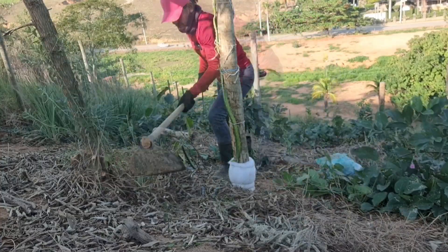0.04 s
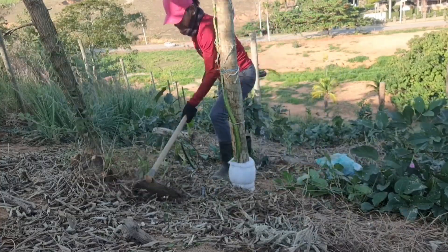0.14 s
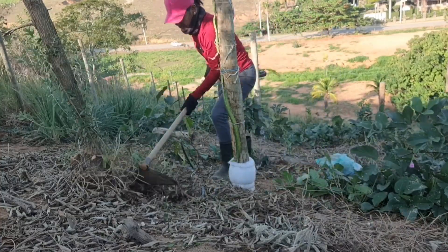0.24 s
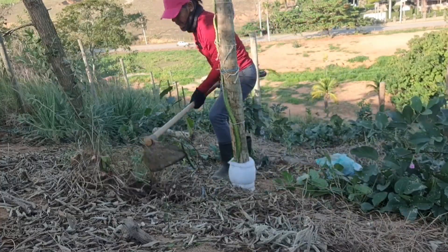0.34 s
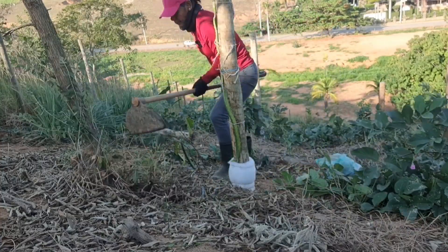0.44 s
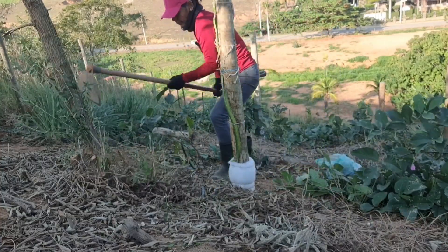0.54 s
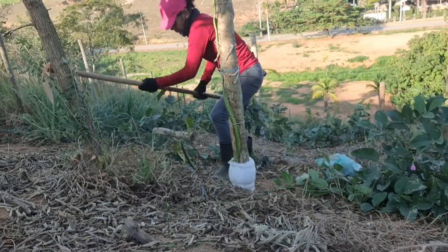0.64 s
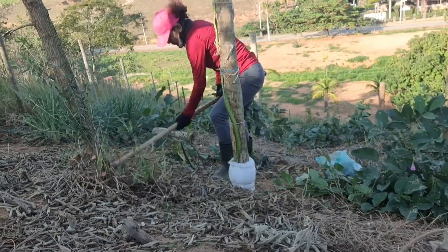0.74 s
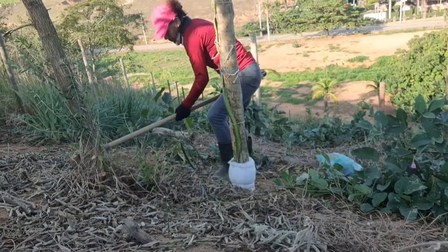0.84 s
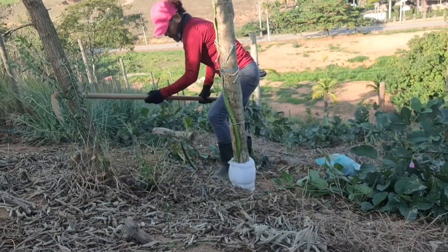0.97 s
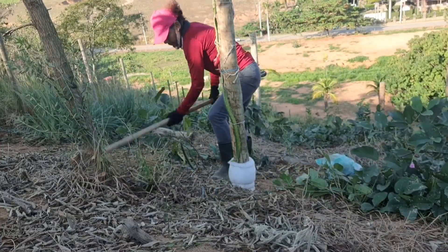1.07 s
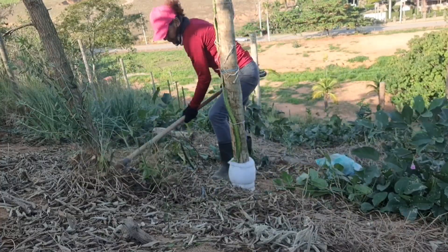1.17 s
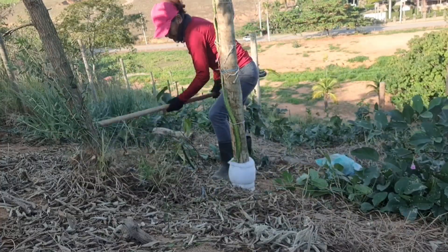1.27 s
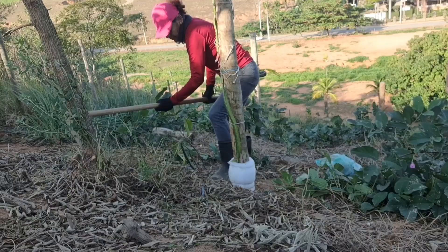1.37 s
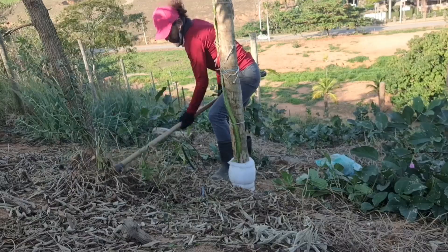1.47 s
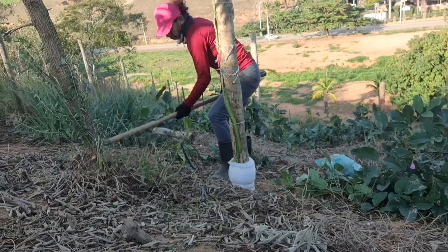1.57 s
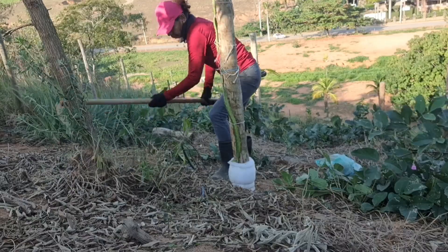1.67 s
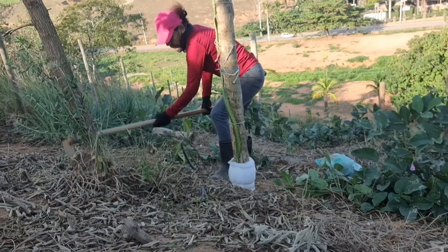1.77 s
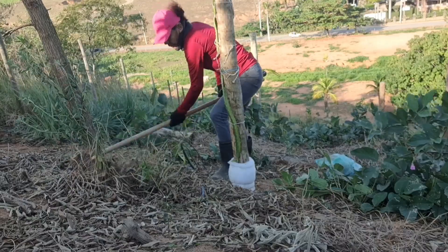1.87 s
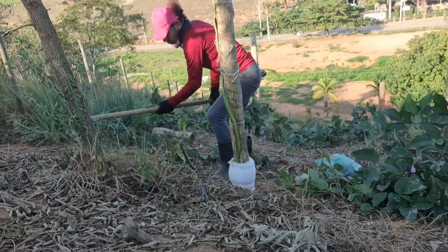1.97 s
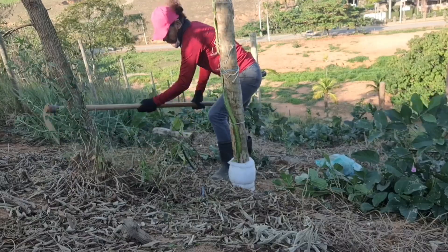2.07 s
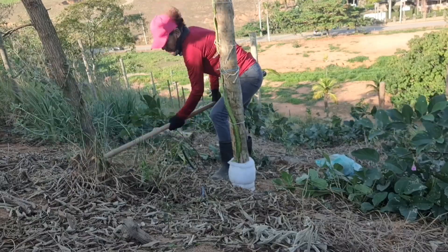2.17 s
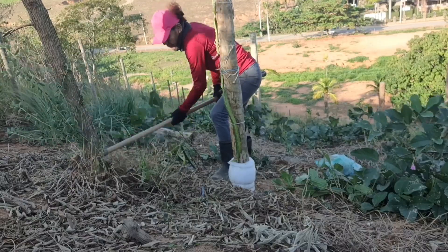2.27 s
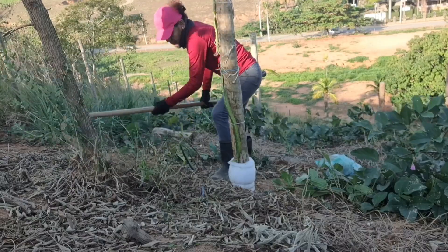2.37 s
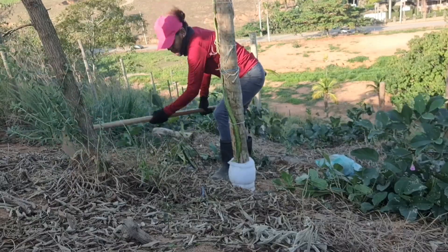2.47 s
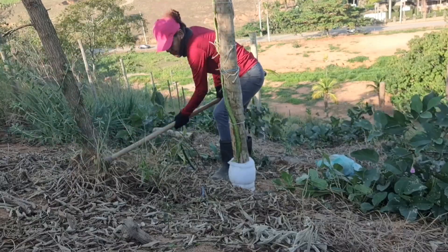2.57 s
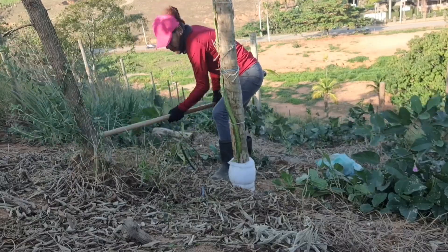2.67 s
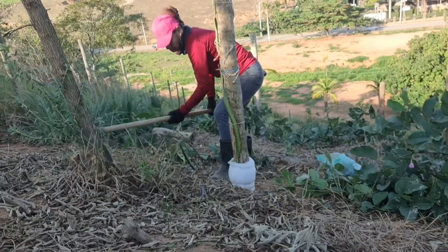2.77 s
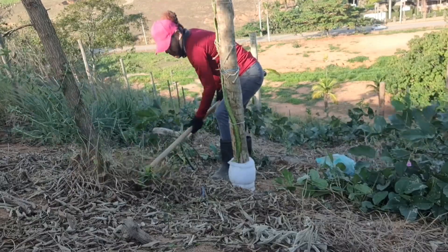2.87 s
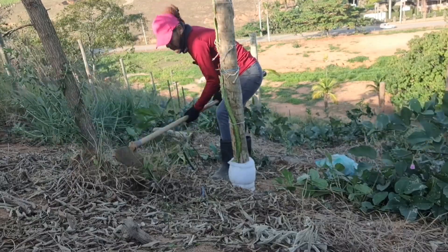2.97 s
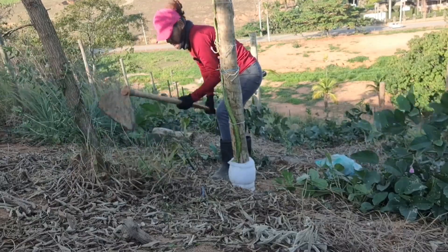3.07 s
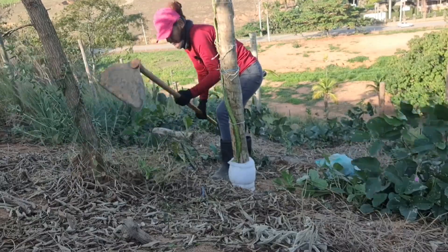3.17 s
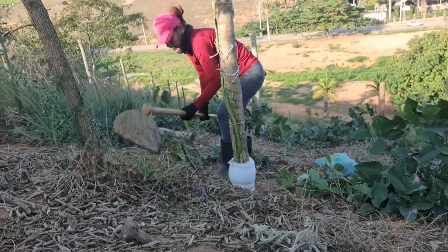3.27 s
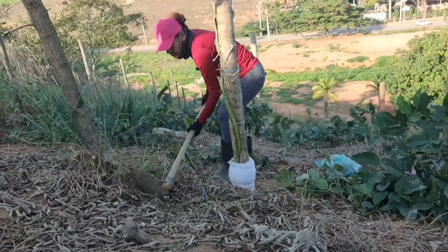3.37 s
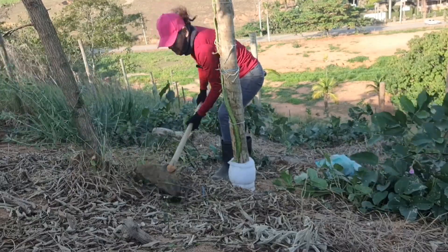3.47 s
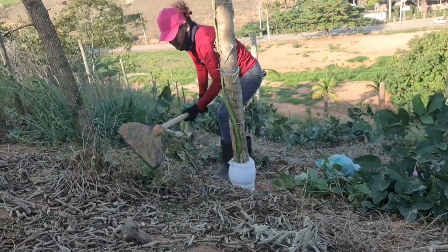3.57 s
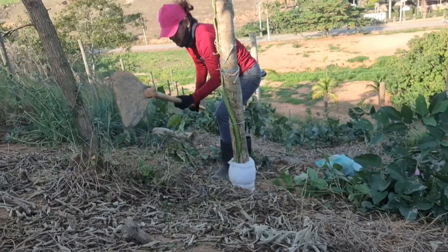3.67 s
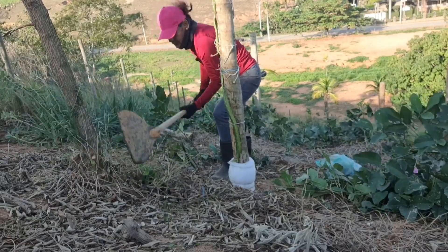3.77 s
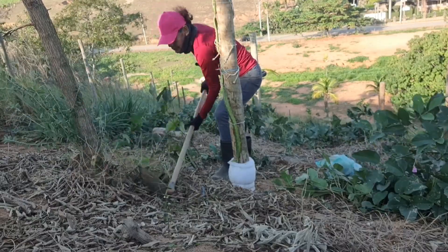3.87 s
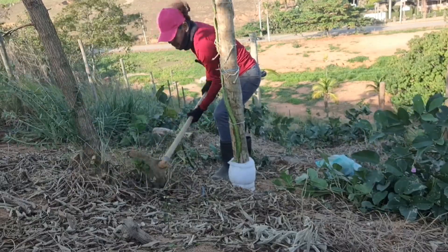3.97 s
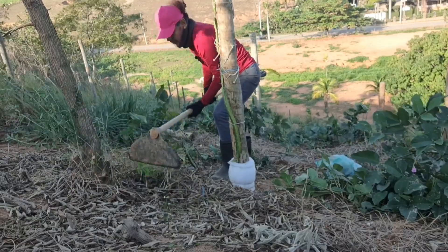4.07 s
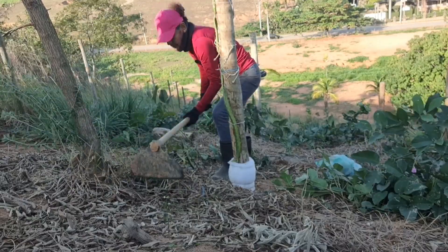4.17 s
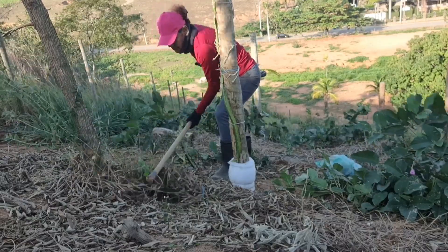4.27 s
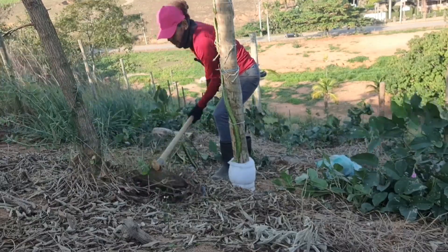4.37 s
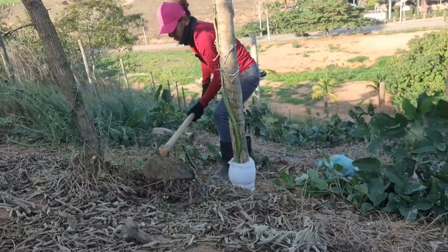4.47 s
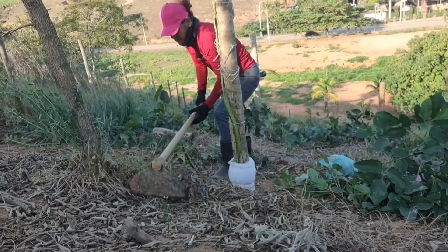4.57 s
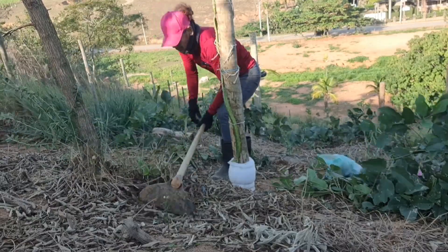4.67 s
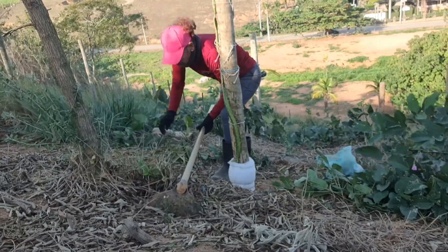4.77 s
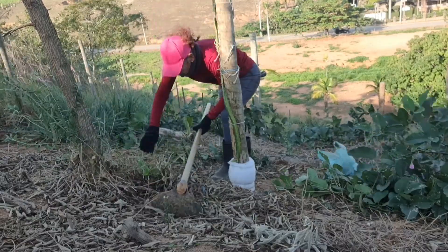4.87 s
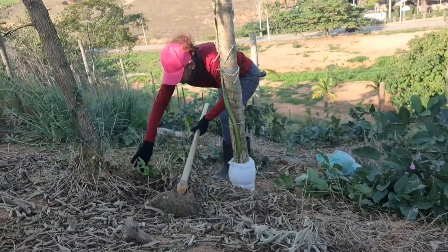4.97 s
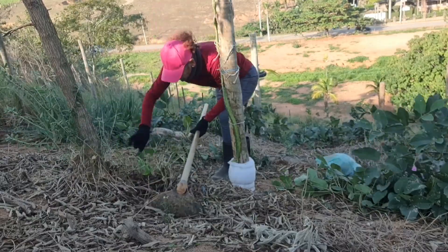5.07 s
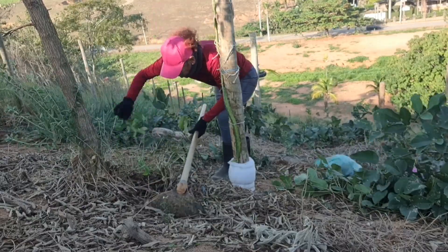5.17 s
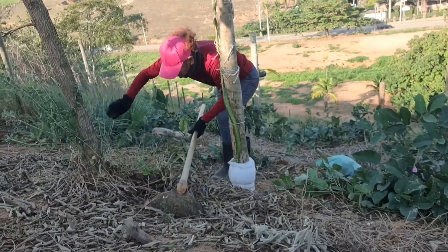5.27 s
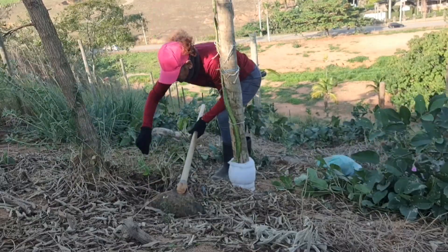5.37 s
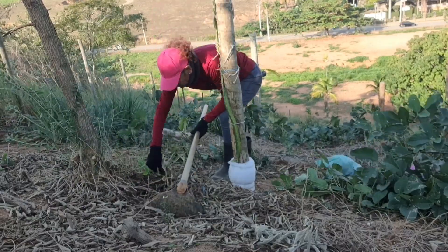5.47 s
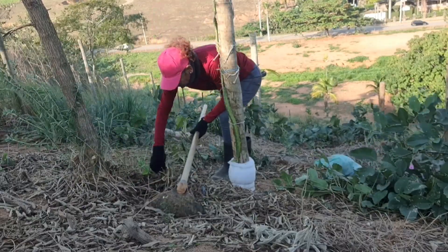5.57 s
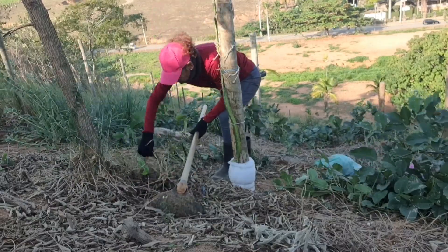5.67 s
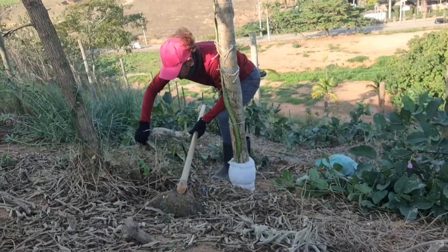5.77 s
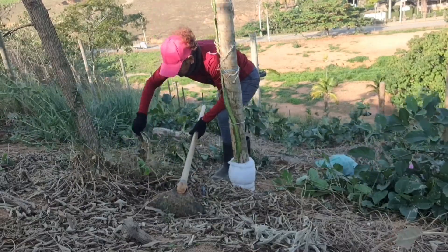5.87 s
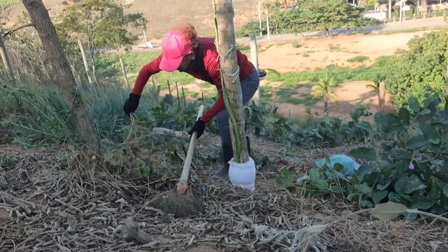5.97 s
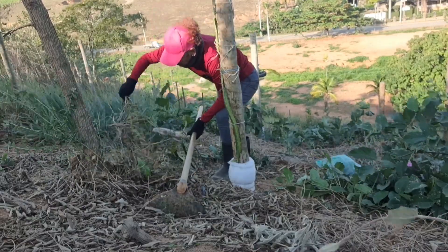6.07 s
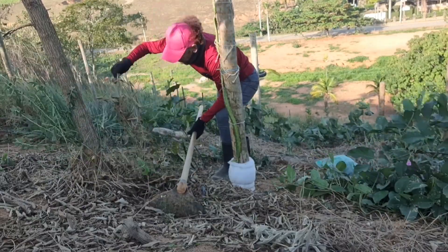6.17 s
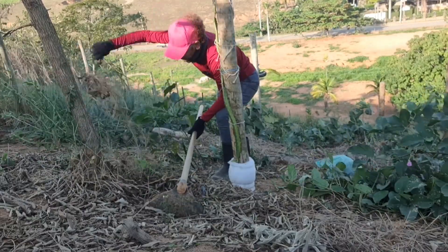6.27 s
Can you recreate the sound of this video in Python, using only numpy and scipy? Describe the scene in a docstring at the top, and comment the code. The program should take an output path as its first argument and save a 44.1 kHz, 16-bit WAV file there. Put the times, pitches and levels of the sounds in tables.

```python
"""A hand hoe chops weeds out of dry garden soil under straw mulch; then a hand tears out and shakes weeds.
Each chop is filtered grains: crumbs and stalks fracture and tap a modal blade, which then drags straw back.
The blade also knocks on packed earth and clinks on stones, as decaying sine modes with a thud or some grit.
Behind it, filtered noise makes open air, insects, road hiss and wind bumps; a wavering sine is a far engine.
All of it reaches one microphone, the same in both channels."""
import sys
import numpy as np
from scipy import signal
from scipy.fft import rfft, irfft
from scipy.io import wavfile
from scipy.ndimage import uniform_filter1d

SR = 44100
rng = np.random.default_rng(int(sys.argv[2]) if len(sys.argv) > 2 else 0)


def master_out(mix):
    """Clip the mix to full scale and print it as 16-bit PCM to the path in sys.argv[1]."""
    frames = np.transpose(np.atleast_2d(mix))
    ceiling = np.clip(frames, -1, 1)
    pcm = np.round(ceiling * 32767).astype(np.int16)
    wavfile.write(sys.argv[1], SR, pcm)


N = 279241
TIME = np.arange(N) / SR
TOP_HZ = 15850  # upper edge of the sound

# spectrum of breaking soil: hz, relative level_db per Hz
SOIL_SPECTRUM = [(100, -25.5), (220, -8.5), (340, -0.5), (490, -11), (690, 2), (880, 0.5), (1080, -5),
                 (1350, -6.5), (1900, -3.5), (2650, -4.5), (3300, -15.5), (6000, -13), (15000, -25)]
# hoe strokes, each a bite and then a pull through the mulch: start_s, soil_db, stalk_crunch_db, bite_s,
# focus_hz (what the contact excites most), pull_db, pull_s, slowing_db_per_s; levels are relative
HOE_STROKES = [(0.158, -39, -20.5, 0.037, 1950, -18, 0.31, 58.5),
               (0.785, -16.5, -9, 0.011, 2230, -29, 0.12, 34),
               (1.133, -17, -14, 0.014, 1760, -22.5, 0.17, 63),
               (1.486, -13, -14, 0.0036, 2150, -28.5, .12, 9),
               (1.841, -12.5, -17, 0.0033, 576, -21.5, 0.22, 34),
               (2.2, -13.5, -12, 0.0031, 1370, -27.5, .2, 13.5),
               (2.569, -15, -22.5, 0.0034, 1070, -28, 0.24, 32),
               (2.856, -19, -18, 0.031, 670, -26.5, 0.19, 42),
               (3.386, -12.5, -31, 0.008, 1750, -20.5, 0.074, 131),
               (3.879, -16, -13.5, 0.021, 1500, -26, 0.13, 86),
               (4.048, -23.5, -47, 0.0077, 1060, -61, .03, 50),
               (4.272, -18, -17.5, 0.023, 1700, -22.5, 0.2, 59),
               (4.667, -26, -16.5, 0.0046, 800, -43.5, 0.14, 20)]


def undb(db):
    """Decibels to gain."""
    return 10 ** (np.asarray(db) / 20)


def unit(x):
    """Scale to rms 1."""
    return x / np.sqrt(np.mean(x ** 2))


def curve(rows, axis=1):
    """One column of a table, joined by straight lines in time."""
    rows = np.array(rows)
    return np.interp(TIME, rows[:, 0], rows[:, axis])


def noise():
    """White noise over the whole scene."""
    return rng.standard_normal(N)


def colour(x, points, size=4096):
    """Minimum-phase filter through (Hz, dB) points; the result has rms 1."""
    hz, db = np.transpose(points)
    bins = np.maximum(np.arange(size // 2 + 1) * SR / size, 1)
    gain = undb(np.interp(np.log(bins), np.log(hz), db))
    # folding the cepstrum makes the filter causal
    cepstrum = irfft(np.log(gain))
    cepstrum[1:size // 2] *= 2
    cepstrum[size // 2 + 1:] = 0
    response = irfft(np.exp(rfft(cepstrum)))
    return unit(signal.oaconvolve(x, response)[:N])


def walk(rate):
    """Smooth random drift with rms 1, taking a new direction `rate` times a second."""
    step = int(SR / rate)
    held = np.repeat(rng.standard_normal(N // step + 1), step)
    return unit(uniform_filter1d(held, step)[:N])


def grains(rate, spread_db, cap_db):
    """Tiny fractures at random moments, `rate` a second: many weak, a few strong."""
    size_db = np.minimum(spread_db * rng.exponential(size=N), cap_db)
    happens = rng.random(N) < rate / SR
    return unit(happens * rng.choice([-1, 1], N) * undb(size_db))


def burst(s, swell, fade, hold=0, db_per_s=0):
    """A force that grows up to its moment, holds while the effort rises or sags, and then dies away."""
    away = np.maximum((s - TIME) / swell, (TIME - s - hold) / fade)
    edges = np.exp(-np.clip(away, 0, 20))
    if not db_per_s:
        return edges
    return edges * undb(db_per_s * np.clip(TIME - s, 0, hold))


def open_air():
    """Steady noise of the open air, heaviest in the bass."""
    # air spectrum: hz, relative level_db per Hz
    air_spectrum = [(20, -9.5), (45, -6.5), (75, -0.5), (110, 4), (165, -10), (260, -12.5), (420, -17.5),
                    (800, -18), (1500, -24.5), (3500, -30), (6000, -35), (8000, -34), (15000, -27)]
    return undb(-40) * colour(noise(), air_spectrum)


def insects():
    """Faint insects in the grass: a narrow band of noise whose level flutters."""
    # insect spectrum: hz, relative level_db per Hz
    insect_spectrum = [(4600, -47), (5900, -8), (7400, -56)]
    chirping = undb(4.5 * walk(rate=16))
    return undb(-64.5) * chirping * colour(noise(), insect_spectrum)


def road():
    """Tyre noise from the far road, rising and falling with the traffic."""
    # traffic: time_s, level_db
    traffic = [(.9, -61), (2, -43.5), (3.65, -42), (4.2, -41.5), (4.9, -47), (5.4, -38), (6.33, -43.5)]
    # tyre spectrum: hz, relative level_db per Hz
    tyre_spectrum = [(50, 1.5), (160, 9), (230, 6), (450, -4.5), (1100, -3), (1900, -16.5), (12000, -27.5)]
    return undb(curve(traffic)) * colour(noise(), tyre_spectrum)


def far_engine():
    """An unevenly firing engine whose treble is lost on the way, so only a loping sine is left."""
    # engine: time_s, mean firing_rate_hz, level_db
    engine = [(0.0, 108.9, -43), (2.89, 93.84, -38), (6.06, 97.3, -41.5), (6.33, 118, -38)]
    rate_hz = curve(engine) * (1 + 0.0233 * walk(rate=35))
    turn = 2 * np.pi * np.cumsum(rate_hz) / SR
    lope = 1 + 0.91 * np.sin(turn / 4)  # four unequal cylinders
    drone = unit(np.sin(turn) * lope * undb(2.4 * walk(rate=47)))
    return drone * undb(curve(engine, axis=2))


def wind():
    """Short eddies push on the microphone as bumps of bass noise."""
    # gusts: peak_s, level_db, swell_and_fade_s
    gusts = [(2.067, -16, 0.0079), (2.44, -18, 0.032), (2.7, -26, 0.097), (3.332, -25.5, 0.032),
             (5.833, -25, 0.036), (5.895, -24.5, 0.079), (6.019, -15.5, 0.016)]
    # wind spectrum: hz, relative level_db per Hz
    wind_spectrum = [(15, 1), (40, 5), (110, 7), (200, -10.5), (400, -17.5), (4000, -54.5)]
    push = sum(undb(db) * burst(s, half, half) for s, db, half in gusts)
    return push * colour(noise(), wind_spectrum)


def garden(x, wet_db=-17, t60=0.45, order=14):
    """Trunks and bushes scatter a short, weak tail back: decaying noise, t60 in seconds."""
    t = TIME[:2 ** order]
    tail = rng.standard_normal(len(t)) * np.exp(-np.log(1000) * t / t60)
    tail = tail / np.sqrt(np.sum(tail ** 2))
    return x + undb(wet_db) * signal.oaconvolve(x, tail)[:N]


def ground_echo(x):
    """The sound arrives a second time off the ground, which carves moving notches into it."""
    # echo behind the direct rustle, later when the stalks are higher up: time_s, lag_ms
    echo_lag = [(.16, 0.098), (.27, 0.115), (.62, 0.05), (.8, 0.14), (5.55, 0.15), (5.95, 0.21), (6.33, .2)]
    late = np.interp(TIME - curve(echo_lag) / 1000, TIME, x)
    return 0.89 * x + 0.28 * late


def crackle(rate, spread_db, patchy_db, count=18):
    """Stalks click at many pitches for a few cycles in a changing mix; a few twigs tick sharply."""
    edges = np.linspace(0, SR / 2, count + 1)
    bins = np.arange(N // 2 + 1) * SR / N
    spectrum = 0
    # overlapping bands, each with its own clicks and its own drifting level
    for hz in edges[edges < TOP_HZ + edges[1]]:
        band = np.cos(np.pi / 2 * np.minimum(abs(bins - hz) / edges[1], 1))
        clicks = grains(rate, spread_db, cap_db=13)
        spectrum = spectrum + band * rfft(clicks * undb(patchy_db * walk(rate=25)))
    twigs = undb(-12.5) * grains(rate=55, spread_db=3, cap_db=7)
    return unit(irfft(spectrum, N)) + twigs


def weeds():
    """Leaves and roots rustle with each tug of the hand; short bright snaps come here and in the hoeing."""
    # the hand gripping, tearing and shaking: start_s, level_db, length_s, effort_growth_db_per_s
    tugs = [(5.023, -44, 0.057, 74), (5.511, -32, 0.28, 21), (5.775, -18.5, 0.039, -40),
            (5.886, -20.5, 0.27, -11), (6.132, -19, 0.056, 0), (6.256, -27, .1, 18)]
    # short bright snaps and rustles of stalks and roots, during hoeing and pulling: peak_s, level_db, fade_s
    snaps = [(0.904, -25.5, 0.0054), (1.448, -32.5, 0.021), (2.515, -30.5, 0.027), (2.82, -19.5, 0.0061),
             (3.067, -28, 0.0045), (3.213, -32.5, 0.0047), (4.76, -30, 0.016), (5.1, -30, 0.0073),
             (5.431, -36, 0.0047), (5.774, -9.5, 0.0088), (5.891, -8, 0.0092), (5.927, -19, 0.007),
             (6.188, -21, 0.0018), (6.212, -14.5, 0.0018)]
    # leaf spectrum: hz, relative level_db per Hz
    leaf_spectrum = [(300, -15.5), (1200, -15), (3000, -10), (6200, -4), (9400, -6.5), (14200, 3.5),
                     (15800, -3)]
    fractures = crackle(rate=2200, spread_db=6.0, patchy_db=2.0)
    rustle = colour(fractures, leaf_spectrum) * undb(1.46 * walk(rate=95))
    pulls = [undb(db) * burst(s, swell=0.008, fade=0.056, hold=length, db_per_s=growth)
             for s, db, length, growth in tugs]
    effort = np.max(pulls, axis=0)  # the strongest tug wins
    snap_force = sum(undb(db) * burst(s, swell=0.0014, fade=fade) for s, db, fade in snaps)
    return ground_echo(rustle * effort + snap_force * colour(noise(), leaf_spectrum))


def blade_ring(focus_hz, bedded=0, order=13):
    """The blade's answer to one tap, energy 1; contact picks its modes, soil shifts and damps them."""
    # free modes of the blade on its handle: mode_hz, relative level_db, t60_s
    blade_modes = [(370, -10, 0.082), (686, 0, 0.082), (842.4, 4, 0.097), (1054, -20, 0.36),
                   (1362, -1.5, 0.041), (1712, -1, 0.046), (1886, -1.5, 0.047), (2375, 4.5, 0.015),
                   (3030, -17, 0.055)]
    t = TIME[:2 ** order]
    hz, db, t60 = np.transpose(blade_modes)
    level_chance, pitch_chance = rng.standard_normal((2, len(blade_modes)))
    octaves = abs(np.log2(hz / focus_hz))
    focus_db = 8.3 * np.exp(-(octaves / 0.16) ** 2) - 9.1 * octaves
    size = undb(db + focus_db + 2 * bedded * level_chance)
    hz = hz * (1 + 0.018 * bedded * pitch_chance)
    t60 = t60 / (1 + 1.13 * bedded)
    decay = np.exp(-np.log(1000) * np.outer(1 / t60, t))
    ring = size @ (np.sin(2 * np.pi * np.outer(hz, t)) * decay)
    return ring / np.sqrt(np.sum(ring ** 2))


def clinks():
    """A hard point of stone sets the free blade ringing, with a short gritty crack."""
    # steel meeting a stone: start_s, relative level_db, focus_hz (what the contact excites most)
    stone_hits = [(.263, -16, 1870), (.266, -22, 790), (1.213, -24, 1880), (1.23, -29, 1690),
                  (1.271, -27.5, 1750), (2.517, -21.5, 960), (2.579, -21, 850), (2.662, -21.5, 985),
                  (2.823, -13.5, 930), (4.769, -25.5, 745)]
    out = np.zeros(N)
    grit = colour(noise(), SOIL_SPECTRUM)
    for s, db, focus_hz in stone_hits:
        ring = blade_ring(focus_hz)
        start = int(s * SR)
        # the bending takes a moment to fill the plate
        ring = ring * (1 - np.exp(-TIME[:len(ring)] / 0.00081))
        out[start:start + len(ring)] += undb(db + 1.0) * ring / np.abs(ring).max()
        out += undb(db - 11) * grit * burst(s, swell=0.0013, fade=0.0057)
    return out


def knocks(order=8):
    """The edge stops dead on packed earth: one push thuds in the ground and rings the buried blade."""
    # edge meeting packed earth: start_s, level_db, focus_hz (what the contact excites most)
    earth_hits = [(.794, -18.5, 666), (1.141, -23, 1700), (1.488, -21.5, 1340), (1.84, -19.5, 694),
                  (2.2, -13.5, 710), (2.57, -24, 1290), (2.876, -23, 830), (3.402, -12.5, 770),
                  (4.278, -19, 855)]
    out = np.zeros(N)
    thud = colour(signal.unit_impulse(N), SOIL_SPECTRUM)
    thud = thud / np.abs(thud).max()
    for s, db, focus_hz in earth_hits:
        ring = blade_ring(focus_hz, bedded=1.1)
        start = int(s * SR)
        knock = ring / np.abs(ring).max() + undb(1.5) * thud[:len(ring)]
        # earth cushions the contact
        knock = knock * (1 - np.exp(-TIME[:len(ring)] / 0.00073))
        # the level is that of the first few milliseconds
        out[start:start + len(ring)] += undb(db) * knock / np.std(knock[:2 ** order])
    return out


def pulling():
    """Each pull starts with the bite, slows steadily and stops as the blade lifts; the straw settles."""
    swell_s, fade_s = 0.0065, 0.046
    settle_db, settle_fade_s = -23, 0.16  # loose straw slides on after the pull; level relative to it
    power = 0
    for s, *_, db, length, slowing in HOE_STROKES:
        pull = burst(s, swell_s, fade_s, length, -slowing)
        settling = undb(settle_db) * burst(s, swell_s, settle_fade_s, length)
        power = power + undb(db) ** 2 * (pull ** 2 + settling ** 2)
    return np.sqrt(power)


def straw():
    """Mulch crackles as the blade pulls it back; crumbs roll along and tick on the steel."""
    # spectrum of dragged mulch: hz, relative level_db per Hz
    mulch_spectrum = [(300, -27), (1900, -11.5), (5300, -4), (10000, -5), (14300, 2.5), (15800, -3.5)]
    fractures = crackle(rate=2500, spread_db=2.5, patchy_db=0.2)
    stalks = colour(fractures, mulch_spectrum) * undb(1.47 * walk(rate=130))
    crumbs = colour(grains(rate=160, spread_db=4, cap_db=10), SOIL_SPECTRUM)
    taps = grains(rate=70, spread_db=3, cap_db=6)
    ticks = signal.oaconvolve(taps, blade_ring(focus_hz=1800, bedded=.5))[:N]
    return (ground_echo(stalks) + undb(-18.5) * crumbs + undb(-18) * ticks) * pulling()


def contact_spectrum(focus_hz, patchy_db=1.5, count=32):
    """Spectrum of one soil contact: each has its own uneven resonances, lifted near the focus."""
    soil_hz, soil_db = np.transpose(SOIL_SPECTRUM)
    hz = np.geomspace(soil_hz[0], soil_hz[-1], count)
    db = np.interp(np.log(hz), np.log(soil_hz), soil_db)
    bump_db = 4 * np.exp(-(2 * np.log2(hz / focus_hz)) ** 2)
    return np.transpose([hz, db + bump_db + patchy_db * rng.standard_normal(count)])


def contacts():
    """Every bite and lesser contact as (force on the soil, force on the stalks, Hz excited most)."""
    # lesser soil contacts around the strokes (first touches, clods knocking, crumbs landing):
    # peak_s, relative level_db, swell_and_fade_s, focus_hz
    lesser_contacts = [(0.178, -20.5, .008, 1700), (0.597, -42.5, 0.033, 1030), (0.77, -23, 0.0024, 2360),
                       (1.166, -23.5, 0.0096, 400), (1.221, -27, 0.017, 1790), (1.58, -34.5, 0.01, 1800),
                       (1.896, -16.5, 0.0091, 1370), (2.007, -29.5, 0.0051, 1810),
                       (2.213, -17, 0.0032, 680), (2.255, -20, 0.011, 800), (2.608, -19, 0.01, 840),
                       (2.903, -23.5, 0.012, 1490), (2.974, -31, 0.0067, 1800),
                       (3.461, -24.5, 0.0082, 1730), (4.764, -26, .011, 1920)]
    stalk_lead_s = 0.0016  # the edge meets the stalks just before the soil
    for s, soil_db, stalk_db, length, focus_hz, *_ in HOE_STROKES:
        on_soil = undb(soil_db) * burst(s, swell=0.0037, fade=0.0091, hold=length)
        on_stalks = undb(stalk_db) * burst(s - stalk_lead_s, swell=0.0055, fade=0.0094, hold=length)
        yield on_soil, on_stalks, focus_hz
    for s, db, half, focus_hz in lesser_contacts:
        force = undb(db) * burst(s, half, half)
        yield force, undb(1.5) * force, focus_hz  # stalks and roots crunch along


def chops():
    """Crumbs burst under the edge and shake the blade; dry stalks crunch with them."""
    # spectrum of crunching stalks: hz, relative level_db per Hz
    stalk_spectrum = [(200, -48), (700, -26), (1900, -8), (5300, -3.5), (8000, -6), (11000, 0),
                      (14300, -0.5), (15800, -1)]
    give = undb(2.27 * walk(rate=240))  # the ground gives way in jerks
    taps = grains(rate=2400, spread_db=0.5, cap_db=8) * give
    crumbs = grains(rate=5000, spread_db=4, cap_db=8.5)
    soil, stalk_force, ring = np.zeros((3, N))
    for on_soil, on_stalks, focus_hz in contacts():
        soil += on_soil * colour(crumbs, contact_spectrum(focus_hz))
        stalk_force += on_stalks
        ring += signal.oaconvolve(on_soil * taps, blade_ring(focus_hz, bedded=0.79))[:N]
    fractures = crackle(rate=3300, spread_db=1, patchy_db=4.0)
    stalks = colour(fractures, stalk_spectrum) * stalk_force
    return undb(-2.0) * soil * give + undb(-2.5) * ground_echo(stalks) + undb(-5.0) * ring


def scene():
    """Everything reaches one microphone, the same in both channels."""
    distance = open_air() + insects() + road() + far_engine()
    work = weeds() + clinks() + knocks() + straw() + chops()
    return np.tile(distance + wind() + garden(work), (2, 1))


def record(dry):
    """The recorder clips the peaks at full scale and cuts the top."""
    low_pass = signal.ellip(10, .2, 80, TOP_HZ, fs=SR, output="sos")
    return signal.sosfilt(low_pass, np.clip(dry, -1, 1))


dry = scene()
out = record(dry)
master_out(out)
```